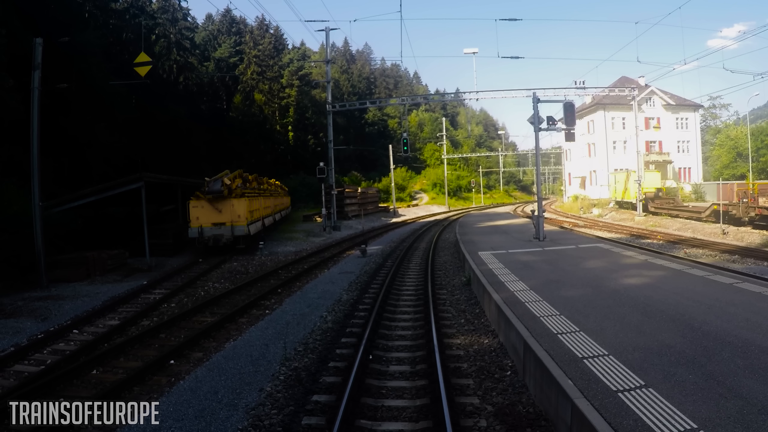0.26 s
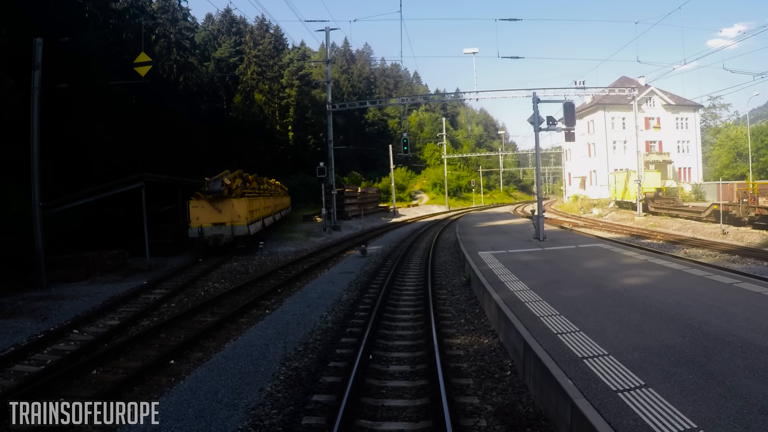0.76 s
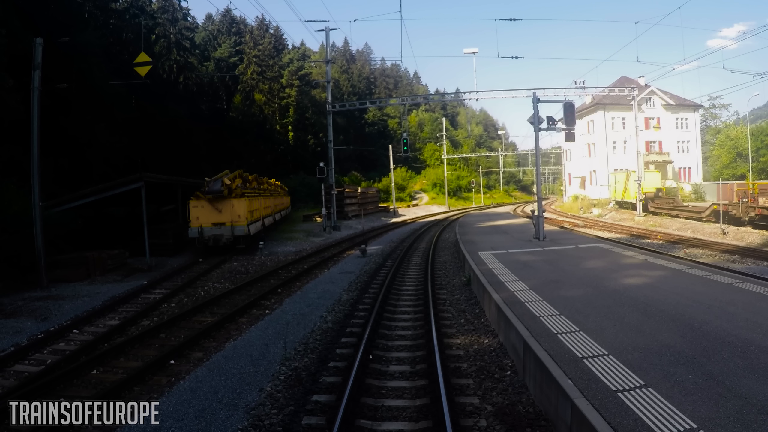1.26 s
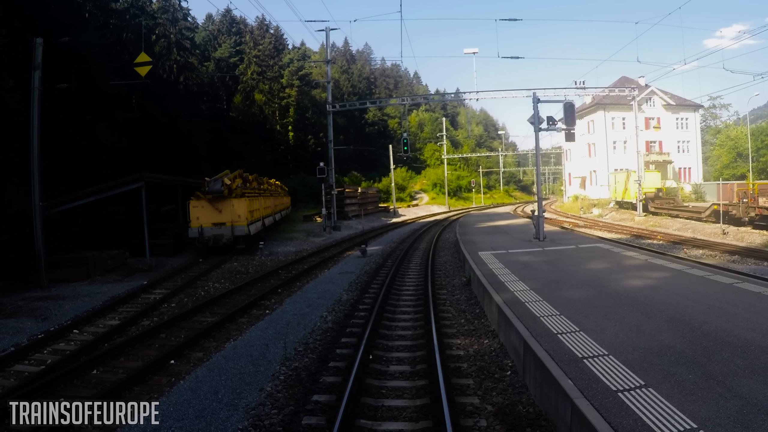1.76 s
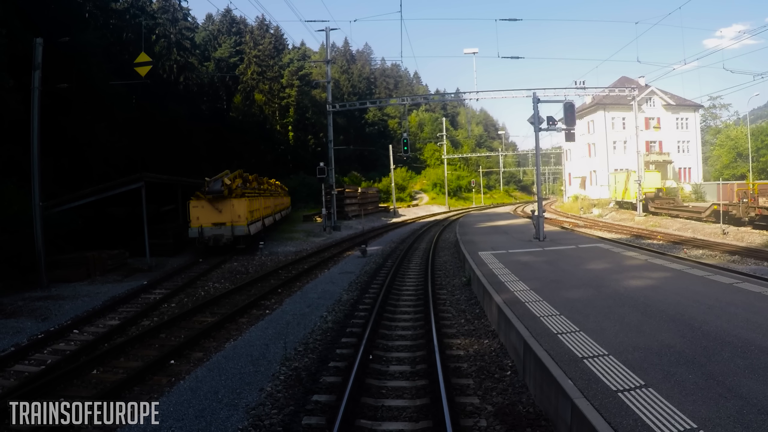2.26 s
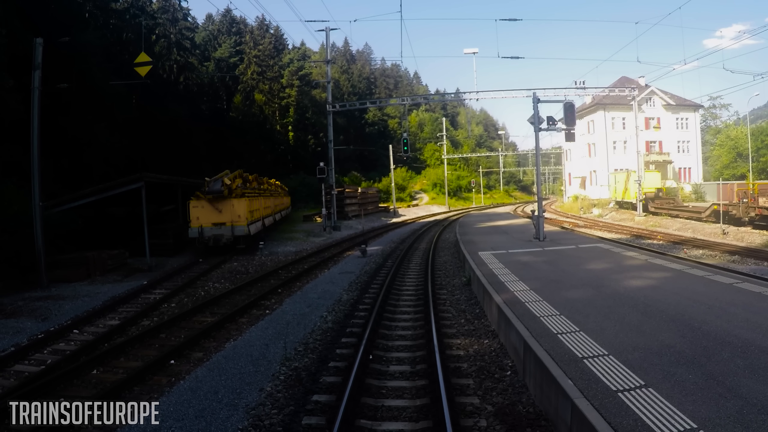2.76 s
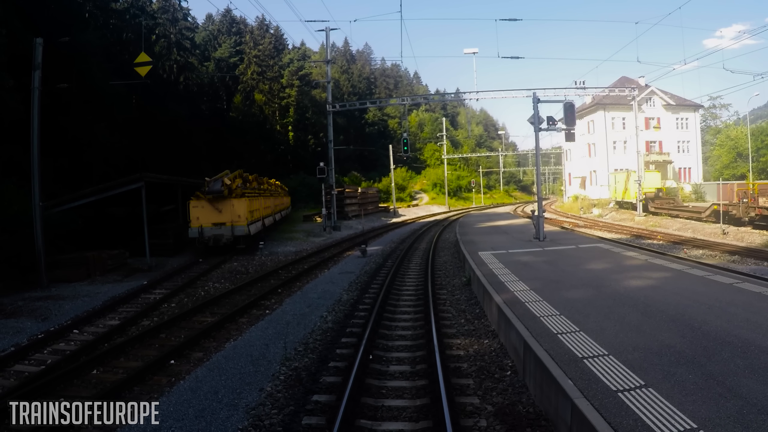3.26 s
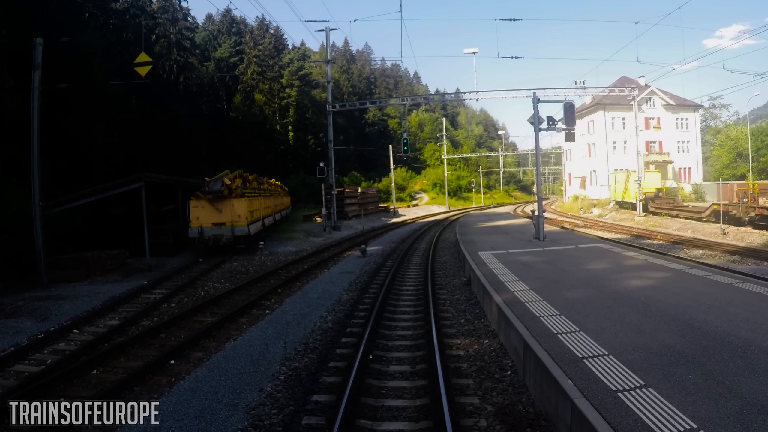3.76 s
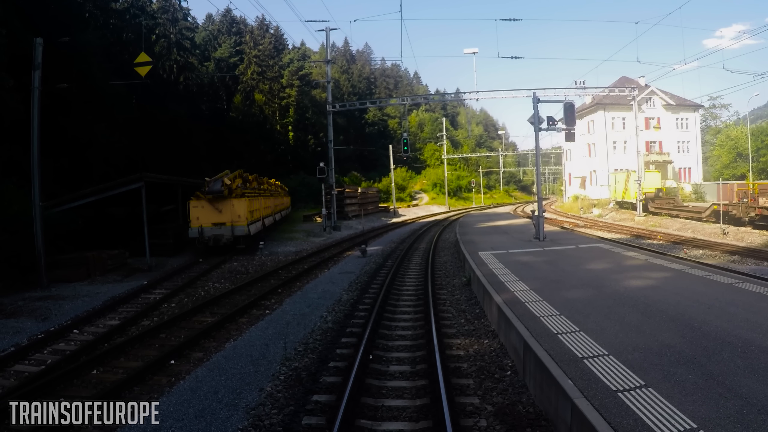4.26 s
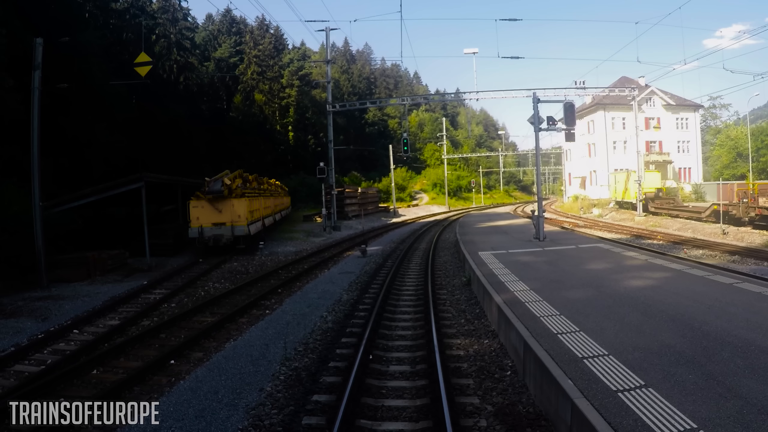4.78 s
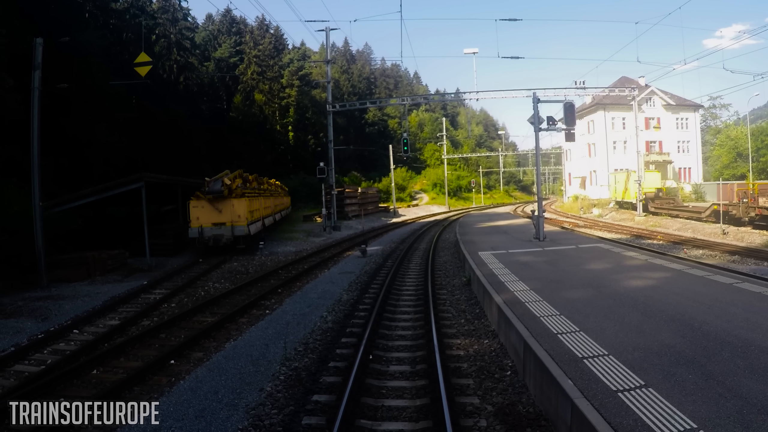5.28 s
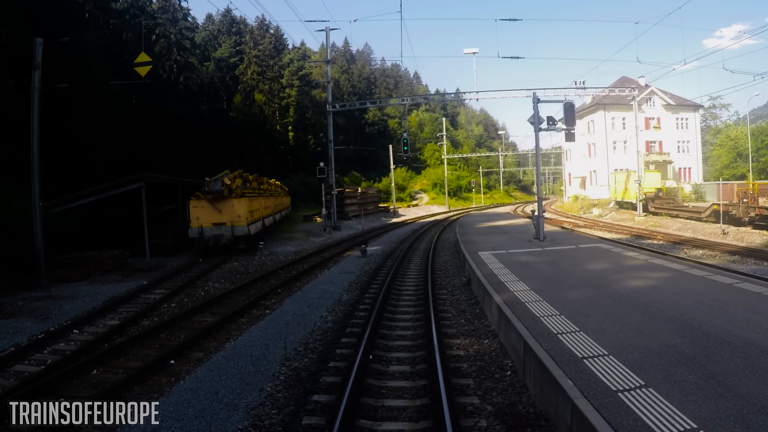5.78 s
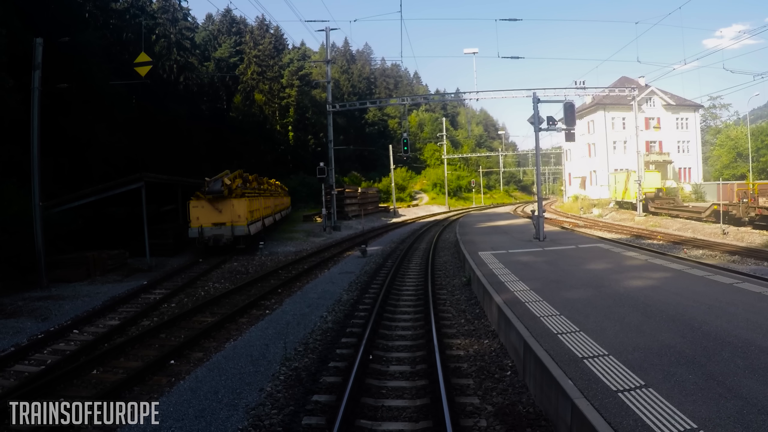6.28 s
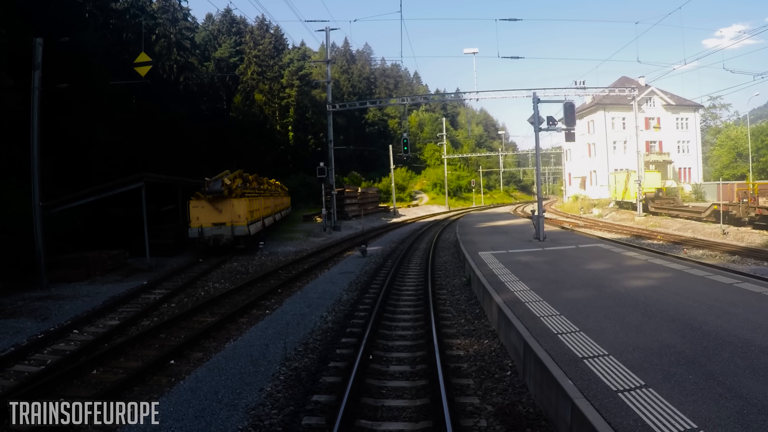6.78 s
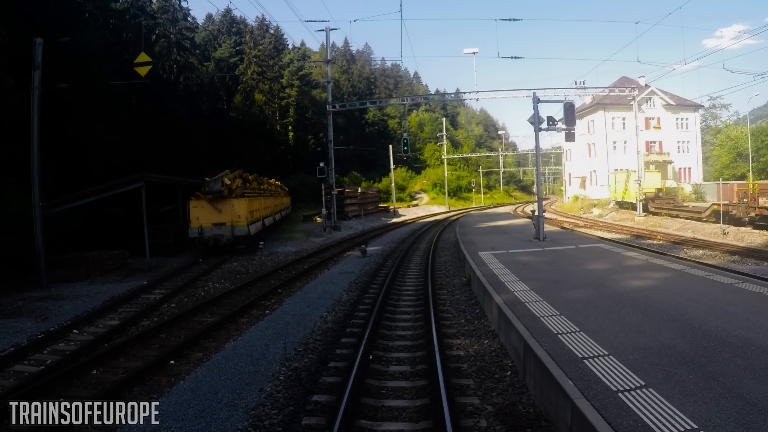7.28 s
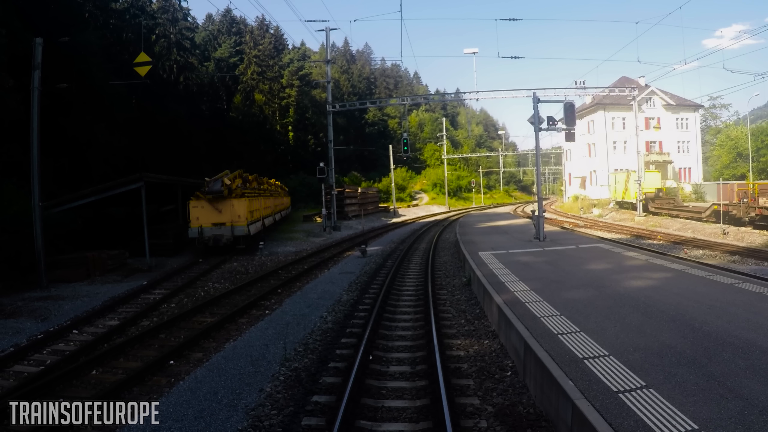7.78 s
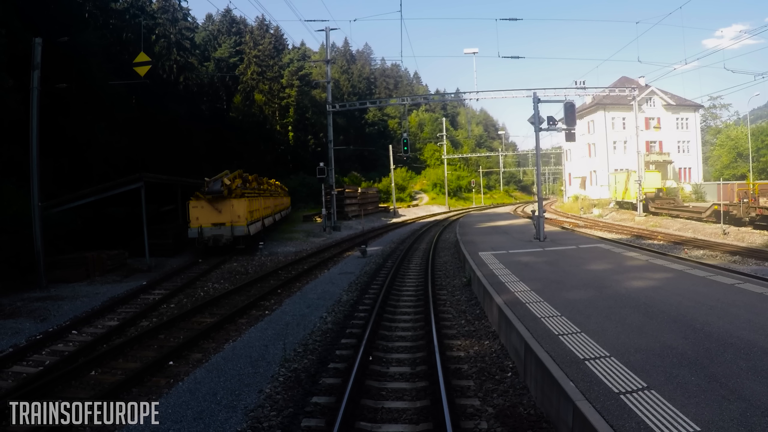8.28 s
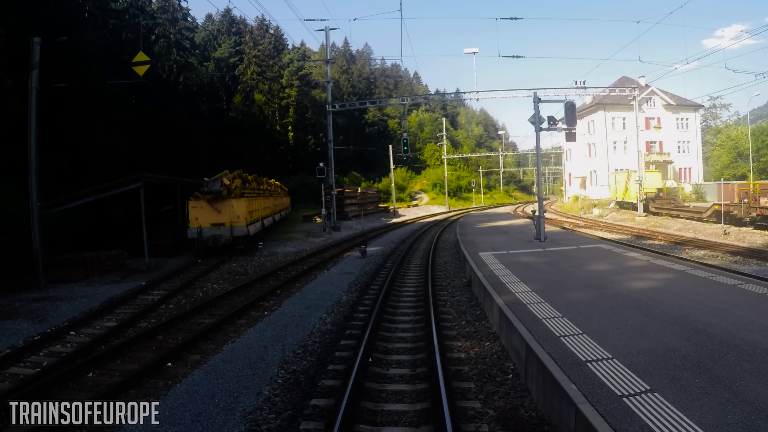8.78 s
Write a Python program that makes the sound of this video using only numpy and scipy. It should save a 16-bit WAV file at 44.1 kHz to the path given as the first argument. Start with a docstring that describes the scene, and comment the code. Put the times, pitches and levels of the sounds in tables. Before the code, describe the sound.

A stationary electric train hums and rumbles, heard from the driver's cab, where a nearby control clicks twice.

```python
"""A low, beating rumble and the hum of auxiliary machines come up through the floor of an electric train's
cab, standing at a platform. One microphone at the driver's desk hears ventilation air ring the cab's
resonances, while the electrics whine and tick faintly in step with the 50 Hz supply. Close by, a control
is clicked twice, its contacts ringing the desk, and a soft hiss of air swells and fades."""
import sys
import numpy as np
from scipy import signal
from scipy.fft import rfft, irfft
from scipy.io import wavfile

SR = 44100
rng = np.random.default_rng(int(sys.argv[2]) if len(sys.argv) > 2 else 0)


def dump_mix(stems):
    """Bounce the given channels to the path in sys.argv[1] as a 16-bit WAV at rate SR."""
    frames = np.atleast_2d(stems).T  # one column per channel
    limited = np.clip(frames, -1, 1)  # hard clip at full scale
    pcm = np.round(limited * 32767).astype(np.int16)
    wavfile.write(sys.argv[1], SR, pcm)


N = 398663
TIME = np.arange(N) / SR
BIN_HZ = np.fft.rfftfreq(N, 1 / SR)

# broad rush of the ventilation air: frequency_hz, level_db
AIR_SPECTRUM = [(20.0, -62), (60.0, -65.5), (110.0, -78), (220.0, -67.5), (340.0, -84), (500.0, -68),
                (750.0, -79), (1100.0, -85), (1450.0, -103.9), (2100.0, -101.0), (3300.0, -104.2),
                (6500.0, -107.3), (8000.0, -112.9), (15000.0, -111.0)]
# resonances of cab and ducts, and narrow whistles of the electrics: pitch_hz, width_hz, level_db
CAB_RESONANCES = [(250, 33, -62.5), (300.3, 14.2, -57), (383, 19.6, -60), (439, 25, -64.5), (600, 31, -67),
                  (675, 65, -76.5), (806, 30, -69), (936.4, 46, -74), (1100, 21, -86), (1215, 52, -77.5),
                  (1317, 99, -81), (1512, 34, -85.5), (1672, 77, -84), (1919, 103, -89), (2300, 160, -98),
                  (2517, 110, -92), (2980, 230, -101), (3590, 110, -99.5), (4290, 45, -96),
                  (4710, 660, -104.5), (6070, 270, -101), (12330, 49, -100)]
# the heavy motor as its load shifts: time_s, level_db
MOTOR_LEVELS = [(0, -35), (1.6, -34), (2.3, -38.5), (3.1, -36.5), (4.1, -35.5), (5.3, -34.5), (6.3, -30.5),
                (7.4, -32.5), (9.04, -34.7)]
# steady tones of the fan motors and the transformer: pitch_hz, level_db
HUM_TONES = [(33.3, -64), (66.6, -49.5), (96.2, -59), (100, -60), (133.6, -54.5), (175.7, -56.5),
             (192.1, -51.5), (201.9, -53.5), (209.3, -39.5), (225.8, -50), (249.3, -56), (255.4, -47),
             (275.9, -56), (292.4, -63), (301.5, -45), (357.5, -76), (384.8, -60.5), (408.5, -51),
             (418.6, -46.5), (433.4, -53), (459.6, -52.5), (528.6, -63), (616.4, -56.5), (672.9, -62.5),
             (965, -69), (1749.2, -67.5), (1782.9, -73), (2145.2, -84), (2298.7, -76), (2332.7, -79.5),
             (2349.5, -75.5), (2451.8, -76.5)]
# the fan that takes up load: time_s, level_db
FAN_LEVELS = [(0, -68), (1.5, -55), (2.2, -78), (4.4, -54), (7.05, -58), (7.35, -48.5), (8.1, -50),
              (9.04, -53)]
# the thin electrical whine: time_s, level_db
WHINE_LEVELS = [(0, -67.5), (1.2, -65.5), (1.6, -68.5), (3.4, -68.5), (4.3, -66), (6.5, -68), (9.04, -67.5)]
# ticks within each supply cycle: start_cycles, relative_level_db
SUPPLY_TICKS = [(.08, -4), (0.312, 6)]
# colour of those ticks: frequency_hz, level_db
TICK_SPECTRUM = [(2500, -128), (4500, -115), (6200, -113), (7500, -124), (11200, -121), (12400, -106),
                 (13300, -112), (14000, -122), (14900, -113)]
# colour of the escaping air: frequency_hz, level_db
HISS_SPECTRUM = [(2000, -125), (3400, -105), (4150, -105), (4310, -90.5), (4450, -103), (5400, -102),
                 (6500, -110), (8000, -125)]
# ringing modes of the desk: pitch_hz, relative_level_db, t60_s
DESK_MODES = [(137, -1, .3), (227.3, 4, 0.27), (279.3, 3, 0.32), (377, -3.5, 0.41), (453, 7.5, 0.092),
              (633, -15, .1), (785, 4.5, 0.058), (925, 0, 0.093), (1064, -4, 0.041), (1263, 2, 0.057),
              (1485, -14.5, 0.19), (1720, -4, 0.074), (1963, -9.5, 0.087), (2360, -30, .06),
              (2447, -6, 0.092), (2920, -13, 0.066), (3660, -11, 0.054)]
# contacts of the desk control: start_s, level_db, low_hz, high_hz
CONTACTS = [(2.978, -56, 1500, 3100), (3.058, -40.5, 1000, 2980), (3.071, -31, 794, 3070),
            (3.076, -24, 170, 1290), (3.085, -27.5, 875, 1060), (3.113, -28.5, 180, 297),
            (3.894, -46.5, 1780, 1930), (3.917, -50, 1780, 1950), (4.230, -34, 1430, 1820),
            (4.235, -30.5, 494, 1760), (4.244, -30.5, 200, 485), (4.262, -35.5, 500, 1500)]


def undb(db):
    """Decibels to gain."""
    return 10 ** (np.asarray(db) / 20)


def curve(rows):
    """Join (time_s, value) rows by straight lines."""
    return np.interp(TIME, *np.transpose(rows))


def colour(points):
    """Gain at every frequency from (frequency_hz, level_db) points."""
    hz, db = np.transpose(points)
    return undb(np.interp(np.log(BIN_HZ + 1), np.log(hz), db))


def shaped(gain, source):
    """Filter a white source of unit power to the given amplitude per root Hz."""
    return irfft(rfft(source) * gain, N) * np.sqrt(SR / 2)


def band(x, low_hz, high_hz):
    """Keep one band with a steep high-pass and low-pass."""
    for hz, kind, order in (low_hz, "high", 4), (high_hz, "low", 9):
        x = signal.sosfilt(signal.butter(order, hz, kind, fs=SR, output="sos"), x)
    return x


def drift(rate_hz):
    """Smooth random wander of unit spread, changing about rate_hz times a second."""
    hz = np.fft.rfftfreq(1024, TIME[-1] / 1024)
    smoothing = np.exp(-(hz / rate_hz) ** 2) * (hz > 0)
    wander = irfft(rfft(rng.standard_normal(1024)) * smoothing)
    return np.interp(TIME, np.linspace(0, TIME[-1], 1024), wander / wander.std())


def tone(hz, sway_rad, sway_hz):
    """A sine of unit rms whose phase sways at random."""
    return np.sqrt(2) * np.sin(2 * np.pi * (hz * TIME + rng.random()) + sway_rad * drift(sway_hz))


def narrow_noise(hz, width_hz, roughness):
    """A randomly driven resonance of unit rms; with less roughness its level is steadier."""
    spectrum = np.exp(-((BIN_HZ - hz) / width_hz) ** 2) * rfft(rng.standard_normal(N))
    analytic = np.fft.ifft(spectrum, N)
    ring = analytic.real * np.abs(analytic) ** (roughness - 1)
    return ring / ring.std()


def ventilation(rush_db=-1, flutter_db=0.27):
    """All round the microphone, turbulent air excites the cab's resonances over a broad rush."""
    resonance_power = sum(undb(db) ** 2 / (1 + ((BIN_HZ - hz) / width_hz) ** 2) ** 3
                          for hz, width_hz, db in CAB_RESONANCES)
    rush_power = (undb(rush_db) * colour(AIR_SPECTRUM)) ** 2
    air = shaped(np.sqrt(resonance_power + rush_power), rng.standard_normal(N))
    return air * undb(flutter_db * drift(2.9))


def cab_boom(level_db=-46):
    """The air enclosed in the cab booms on one low note."""
    return undb(level_db) * narrow_noise(143.2, width_hz=9.5, roughness=0.93)


def floor_rumble(motor_hz=48.06, twin_hz=48.635, slow_hz=41.835, partner_db=-43.5, shake_db=-41.5):
    """Underfoot, a heavy motor beats with its near twin, a slower one adds a throb, the floor shakes."""
    turns = motor_hz * TIME + rng.random()
    motors = undb(curve(MOTOR_LEVELS)) * np.sin(2 * np.pi * turns)
    # at in_step_s each partner pushes together with the heavy motor
    for hz, in_step_s in (twin_hz, 4.8), (slow_hz, 4.596):
        turns_ahead = (hz - motor_hz) * (TIME - in_step_s)
        motors += undb(partner_db) * np.sin(2 * np.pi * (turns + turns_ahead))
    shake = undb(shake_db) * narrow_noise(44.9, width_hz=2.2, roughness=0.67)
    return np.sqrt(2) * motors + shake


def machine_hum(waver_db=0.82):
    """Fan motors and transformer hum through the floor, each tone wavering a little in level."""
    return sum(undb(db + waver_db * drift(1.3)) * tone(hz, sway_rad=0.29, sway_hz=2.1)
               for hz, db in HUM_TONES)


def fans(steady_hz=830, loaded_hz=834, steady_db=-59, waver_db=1.7):
    """A steady blade tone beats with that of a second fan, which wavers and takes up load."""
    loaded_db = curve(FAN_LEVELS) - waver_db * drift(1.3)
    loaded = undb(loaded_db) * tone(loaded_hz, sway_rad=1.0, sway_hz=1.04)
    return loaded + undb(steady_db) * tone(steady_hz, sway_rad=0.35, sway_hz=2.0)


def electrical_whine(swell_db=1.4, whistle_db=-73):
    """The electrics whine in small swells under a faint, higher whistle."""
    whine_db = curve(WHINE_LEVELS) + swell_db * drift(8.9)
    whine = undb(whine_db) * narrow_noise(2523, width_hz=26, roughness=0.78)
    return whine + undb(whistle_db) * narrow_noise(6152, width_hz=47, roughness=0.61)


def supply_buzz(supply_hz=50, decay_s=0.0013):
    """The electrics tick in tiny noise bursts of uneven strength, locked to the supply cycle."""
    envelope = 0
    for start_cycles, db in SUPPLY_TICKS:
        cycle, age_cycles = np.divmod(TIME * supply_hz + 1 - start_cycles, 1)
        strengths = undb(db) * rng.uniform(.45, 1, N)
        envelope += strengths[cycle.astype(int)] * np.exp(-age_cycles / supply_hz / decay_s)
    ticks = envelope * rng.standard_normal(N)
    return shaped(colour(TICK_SPECTRUM), ticks / ticks.std())


def air_hiss(start_s=3.55, attack_s=0.2, hold_s=0.89, fall_db_per_s=6, gain_db=-2.5):
    """Air escapes softly with a faint whistle, then dies away as the pressure falls."""
    age_s = TIME - start_s
    opening = np.clip(age_s / attack_s, 0, 1)
    fall_db = fall_db_per_s * np.maximum(age_s - attack_s - hold_s, 0)
    return shaped(colour(HISS_SPECTRUM), rng.standard_normal(N)) * opening * undb(gain_db - fall_db)


def desk_control(scatter_db=-13, cab_t60_s=0.12, scrape_db=-13, scrape_t60_s=0.06, rise_s=0.00059):
    """Close to the microphone, each contact rings the desk and scatters briefly round the small cab."""
    clicks = np.zeros(N + SR)
    t = TIME[:SR // 2]
    attack = t < .02  # the first 20 ms set a contact's level
    onset = 1 - np.exp(-t / rise_s)
    for start_s, level_db, low_hz, high_hz in CONTACTS:
        ring = sum(undb(db - 60 * t / t60_s) * np.sin(2 * np.pi * (hz * t + rng.random()))
                   for hz, db, t60_s in DESK_MODES)
        ring /= 2 * ring[attack].std()
        scatter = undb(scatter_db - 60 * t / cab_t60_s) * rng.standard_normal(len(t))
        hit = band((ring + scatter) * onset, low_hz, high_hz)
        # hard contacts also scrape faintly; dull thuds do not
        hardness = min(high_hz / 1750, 1) ** 4
        grit = band(rng.standard_normal(len(t)), low_hz=2400, high_hz=6200)
        grit = signal.lfilter([1], [1, -.8], grit)  # tilt towards the low end of the band
        scrape = hardness * undb(scrape_db - 60 * t / scrape_t60_s) * grit / 2
        first = int(start_s * SR)
        clicks[first:first + len(t)] += undb(level_db) * (hit / hit[attack].std() + scrape)
    return clicks[:N]


def scene():
    """Everything that reaches the microphone at the driver's desk, in mono."""
    background = machine_hum() + floor_rumble() + fans() + cab_boom() + electrical_whine() + ventilation()
    return (background + air_hiss() + supply_buzz() + desk_control())[None]


def record(dry, low_cut_hz=37, high_cut_hz=15100):
    """The recorder thins the deepest bass and cuts the top steeply."""
    thinned = irfft(rfft(dry) / np.sqrt(1 + (low_cut_hz / (BIN_HZ + 1)) ** 8), N)
    return signal.sosfilt(signal.ellip(10, .2, 80, high_cut_hz, fs=SR, output="sos"), thinned)


dry = scene()
out = record(dry)
dump_mix(out)
```